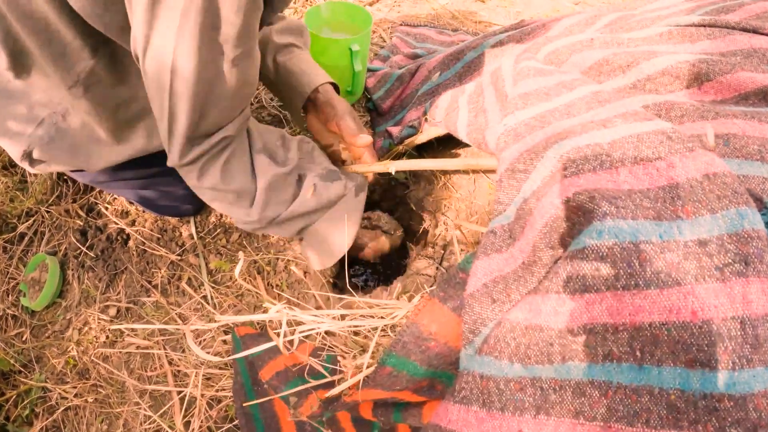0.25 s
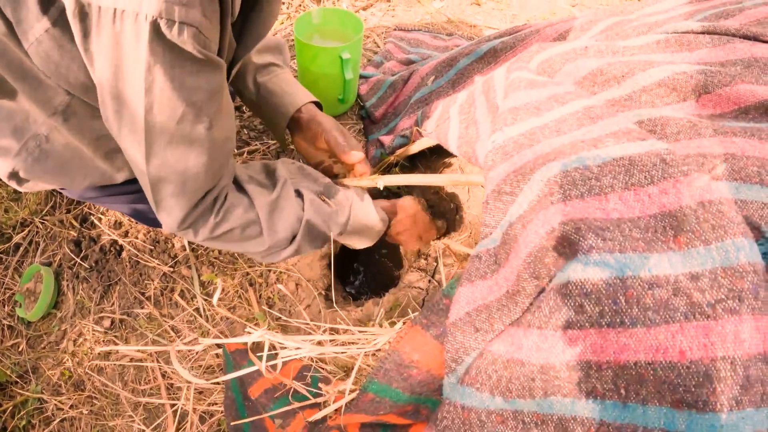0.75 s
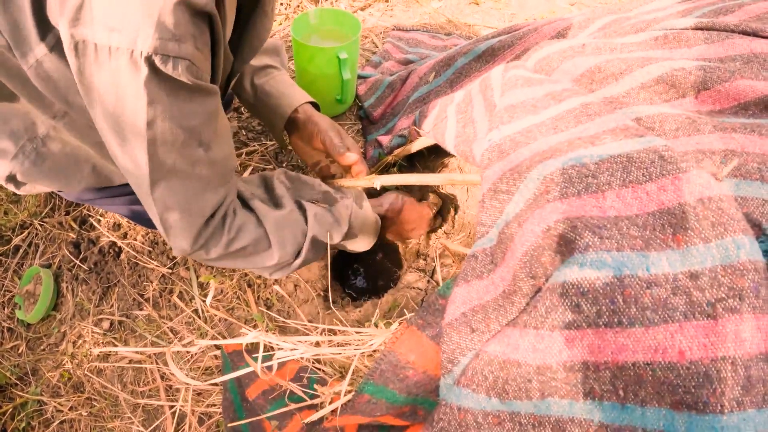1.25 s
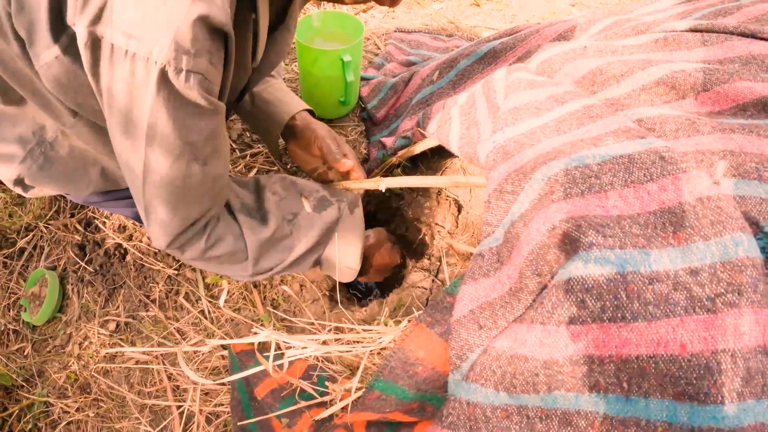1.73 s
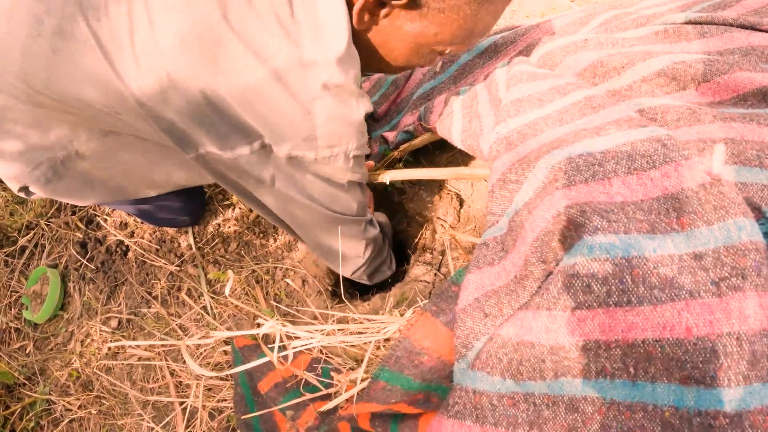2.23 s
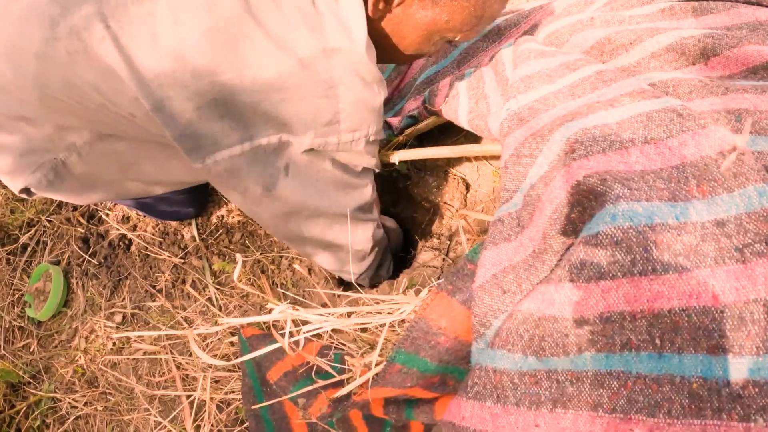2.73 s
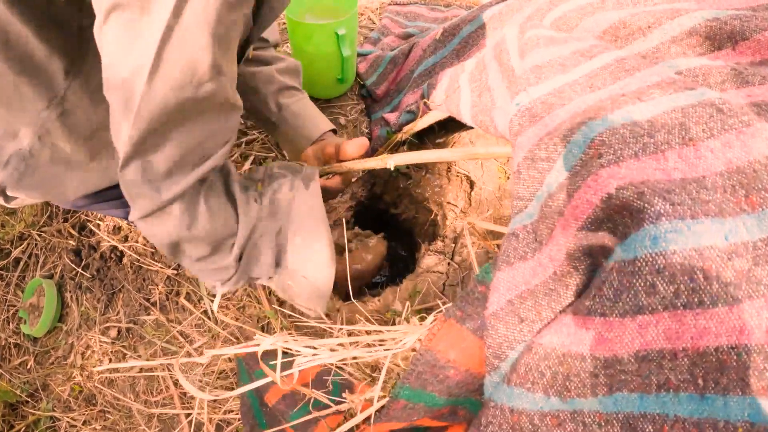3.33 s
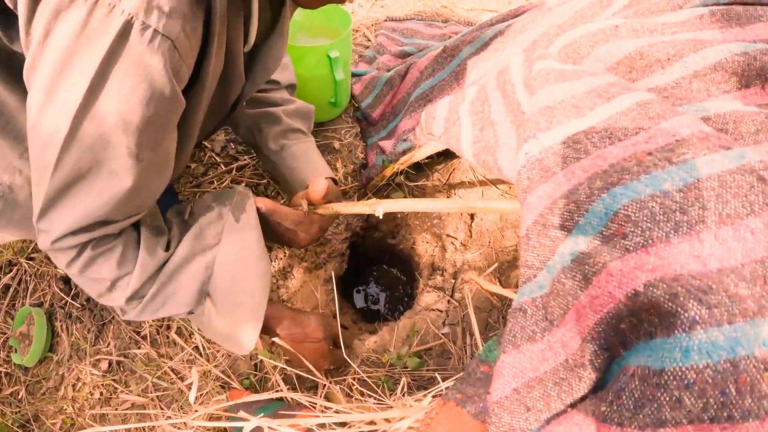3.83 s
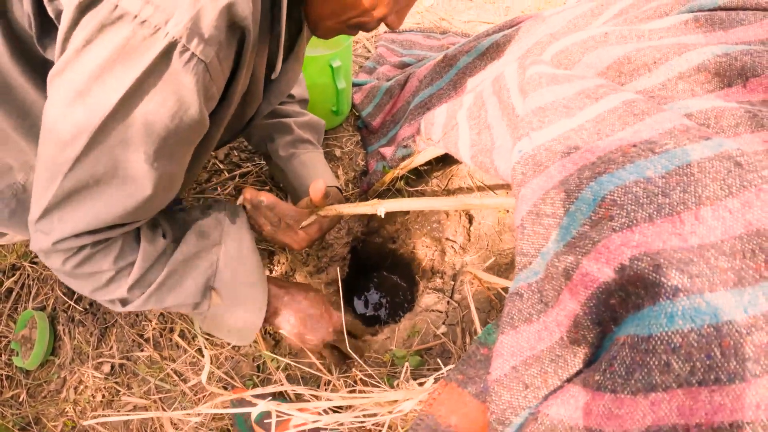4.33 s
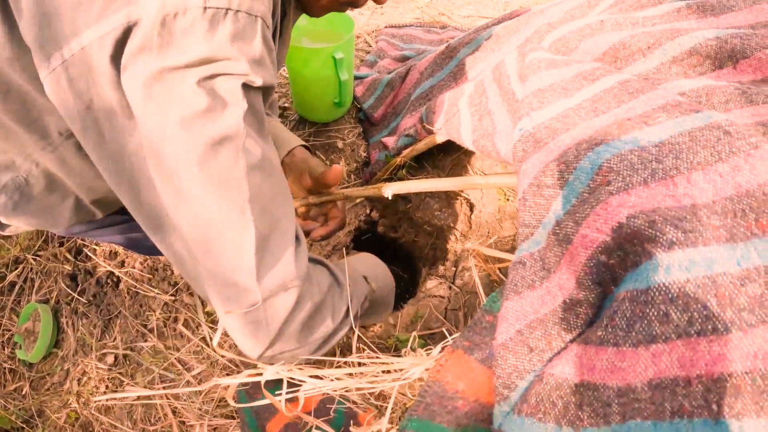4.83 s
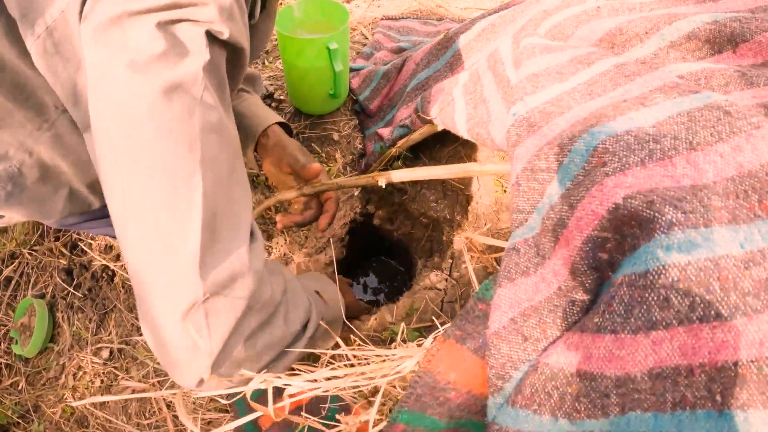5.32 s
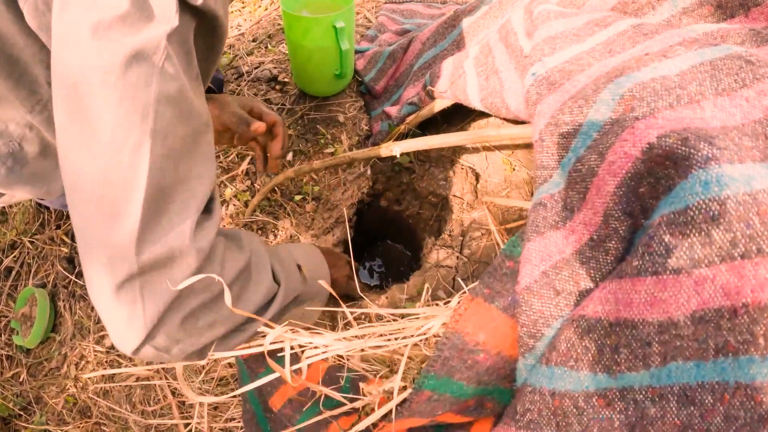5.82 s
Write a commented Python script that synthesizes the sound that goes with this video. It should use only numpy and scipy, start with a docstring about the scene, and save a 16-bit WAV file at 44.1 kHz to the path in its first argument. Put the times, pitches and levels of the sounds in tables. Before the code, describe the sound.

In quiet, dry grassland, hands work close to the microphone at a wet hole in the soil. Straw rustles and snaps, grit scrapes and mud gives small pops. A cricket trills thinly in bouts while small birds chip, then whistle, then twitter briefly about halfway through. Distant insects and a faint land rumble lie underneath. Low wind flutter on the microphone grows strongest in the last two seconds.

```python
"""A cricket trills in bouts in dry grassland, each closing wing stroke sounding one high note.
Up close, hands work a wet hole in the soil: straw rustles and snaps, grit scrapes, mud pockets pop.
Small birds whistle, chip and twitter over a bed of far insects, land rumble and a brief rough hum.
Wind sheds eddies off the microphone cover, a low flutter that is strongest in the last two seconds."""
import sys
import numpy as np
from scipy import signal
from scipy.fft import rfft, irfft, next_fast_len
from scipy.io import wavfile
from scipy.ndimage import uniform_filter1d, map_coordinates

SR = 44100
rng = np.random.default_rng(int(sys.argv[2]) if len(sys.argv) > 2 else 0)


def int16_out(signal):
    """Quantize to a 16-bit WAV file."""
    q = np.round(np.clip(np.atleast_2d(signal).T, -1, 1) * 32767)
    wavfile.write(sys.argv[1], SR, q.astype(np.int16))


N = 267642

# Cricket bouts; a positive pan is louder on the left: (start [s], end [s], first level [dB], last level [dB],
# one closing stroke [s], stroke rate [Hz], note [Hz], opening stroke [dB], sustain [ratio], pan [dB])
CRICKET_BOUTS = [(0, 0.236, -63, -59, .0935, 38.5, 7020, -4, .35, 4),
                 (0.982, 2.569, -58, -57.5, 1.0901, 38.2, 7025, -11, .1, -3.5),
                 (3.3, 4.863, -61, -64.5, 3.5031, 38.25, 7000, -9, .21, 4.5),
                 (5.573, 6.102, -69, -64.5, 5.7026, 37.9, 6975, -4.5, 0.4, 6)]

# Faders for the straw and cloth rustle: (time [s], hiss [dB], low body [dB], high body [dB])
RUSTLE_FADERS = [(0, -60, -63, -54.5), (.29, -70, -65, -56), (.57, -65, -60, -58), (.96, -69, -63.5, -61.5),
                 (1.45, -64.5, -64.5, -63.5), (1.85, -72, -63.5, -57.5), (2.25, -67, -61.5, -59.5),
                 (2.6, -71, -62.5, -63.5), (3.14, -67, -63, -58), (3.5, -66, -63, -63),
                 (3.87, -65, -65.5, -65), (4.55, -69.5, -65, -66), (4.9, -62.5, -66, -64.5),
                 (5.27, -68, -63, -64), (5.68, -61, -64, -62), (6.07, -75.5, -66, -69.5)]
# EQ of those three rustle layers: (frequency [Hz], gain [dB])
HISS_EQ = [(4000, -27), (6000, -4), (7300, -0.5), (8300, -10), (11900, -15), (14200, -11.5), (15600, -36)]
LOW_BODY_EQ = [(700, -51), (950, -2.5), (1050, 1), (1400, 1), (2000, -2.5), (2600, -29.5)]
HIGH_BODY_EQ = [(1500, -38), (2100, -0.5), (2900, 0.5), (3900, -3), (5000, -1), (7000, -7.5), (8000, -47)]
# Stereo width of all noise beds: (frequency [Hz], left-right likeness [ratio])
BED_LIKENESS = [(60, 0.89), (130, 0.8), (500, 0.43), (1500, 0.56), (3000, 0.41), (6000, 0.63), (10000, 0.8),
                (14000, 0.14)]
# Stereo balance of all noise beds: (frequency [Hz], pan [dB])
BED_PAN = [(60, -3), (150, -1), (350, -6), (1500, 2), (5000, 0.3), (10000, 2)]

# Faders for the far ambience: (time [s], rumble [dB], murmur [dB], insects [dB])
AMBIENCE_FADERS = [(0, -57.5, -72.5, -78), (.62, -57.5, -66, -67), (1.08, -57, -71, -61),
                   (1.45, -58, -71, -66.5), (2.21, -56, -67.5, -59.5), (2.7, -57.5, -71, -61.5),
                   (3.19, -56, -65.5, -62.5), (3.82, -56, -72, -59.5), (4.3, -58, -72.5, -61.5),
                   (4.87, -55, -70.5, -61), (5.22, -58.5, -72, -67), (5.6, -58, -68, -71),
                   (6.07, -60.5, -73.5, -66)]
# EQ of the open land's rumble and murmur: (frequency [Hz], gain [dB])
RUMBLE_EQ = [(15, -32), (25, 1), (47, -7.5), (86, -20.5), (102, -17.5), (146, -4), (183, -3), (480, -20),
             (620, -39), (1060, -120)]
MURMUR_EQ = [(250, -21), (400, -4.5), (600, -5), (900, -8.5), (1100, -38)]
# Bands of far insects: (centre [Hz], width [Hz], trim [dB])
INSECT_BANDS = [(5740, 30, -10), (5540, 60, -10), (4960, 250, -12), (6770, 360, -4.5), (5750, 900, -8)]

# Light air on the microphone: (time [s], level [dB])
BREEZE_FADER = [(0, -64), (1, -62.5), (2.1, -58), (2.75, -57), (3.3, -54), (3.8, -58.5), (4.1, -48),
                (4.48, -56.5), (4.9, -48.5), (5.3, -44), (6.07, -46.5)]
# Puffs of wind: (middle [s], length [s], level at the crest [dB], eddy rate [Hz])
WIND_PUFFS = [(0.16, 0.16, -51, 34.5), (.68, .06, -52, 32), (0.867, .08, -53.5, 32),
              (1.033, 0.07, -47.5, 36), (1.191, .12, -42.5, 55), (1.332, 0.064, -49, 38),
              (1.522, 0.14, -47.5, 48.5), (1.882, 0.086, -45, 62.2), (2.225, 0.24, -52, 48),
              (2.578, .13, -46.5, 59.5), (2.902, 0.068, -48.5, 55), (2.973, .07, -48, 56),
              (3.161, 0.091, -45.5, 52.04), (3.249, 0.083, -43, 58.2), (3.361, .07, -46, 55),
              (3.462, .12, -47.5, 36), (3.581, 0.17, -44.5, 41.7), (3.93, 0.17, -33, 54.75),
              (4.03, .15, -34.5, 54), (4.157, 0.088, -32, 51), (4.256, 0.085, -37, 46),
              (4.354, 0.13, -43, 45.9), (4.6, .14, -42.5, 48.2), (4.701, 0.1483, -31.5, 52.9),
              (4.816, .1, -36, 48), (5.025, .24, -29, 55.5), (5.157, .11, -30.5, 55),
              (5.27, 0.14, -30, 53.1), (5.4, 0.095, -36, 42.1), (5.479, .12, -33.5, 45.08),
              (5.599, 0.12, -36, 45.1), (5.743, 0.078, -37.5, 42), (5.816, 0.09, -30, 45.97),
              (5.901, 0.093, -33.5, 44.34), (6.02, .16, -36, 42)]
# EQ of the wind's buffeting: (frequency [Hz], gain [dB])
BUFFET_EQ = [(8.8, -22), (15, -1), (59, -8.5), (78, -5), (120, -15.5), (160, -33), (260, -120)]

# Breaking straw: (time [s], level [dB], body trim [dB], body centre [Hz])
STRAW_SNAPS = [(.0708, -43, 3, 3010), (.1092, -41, 5, 3010), (.2074, -46, 5, 3020), (.2563, -51, 4, 5910),
               (.2923, -51, 3, 5700), (.348, -43, -1, 2510), (.4015, -51, 15, 6000), (.4184, -43, -1, 2920),
               (.4633, -48, 1, 6500), (.499, -51, -3, 6500), (.531, -37.5, -5, 3810),
               (.5683, -43.5, 8, 5900), (.596, -50, 8, 4500), (.6122, -49, 17.5, 4400),
               (.6493, -46, -8, 5910), (.888, -48, 4, 5690), (1.2067, -46, -6, 2830),
               (1.3598, -47, -1, 5660), (1.4498, -46, -7, 5330), (1.498, -47, 6, 4800),
               (2.628, -40, -17, 5460), (3.3528, -47.5, 7, 3520), (3.4702, -37.5, -4, 3570),
               (3.5007, -43.5, 11, 5620), (3.527, -48, 9, 5670), (3.5481, -39, 11, 2650),
               (3.8099, -45, 4, 5000), (4.023, -52, 13, 2400), (4.241, -58.5, 15, 3800),
               (4.6916, -48.5, 1, 5990), (4.787, -43, -2, 4123), (4.8282, -35, 11, 4150),
               (4.8366, -33.5, 6, 5394), (4.845, -34.5, 10.5, 4190), (4.8615, -44, -9, 5130),
               (4.897, -42, -1, 4066), (4.9155, -36.5, 8, 4450), (5.0961, -45, 3.5, 2816),
               (5.3066, -47, -6, 5150), (5.449, -42, -10, 4830), (5.5228, -41, -8, 5954),
               (5.687, -38.5, -6, 5460), (5.7285, -40, 4, 4040), (5.9242, -51.5, 9, 5586)]

# Two-voiced bird chips: (time [s], upper voice [dB], lower voice [dB], pan [dB])
BIRD_CHIPS = [(.24, -57, -56, 0), (.448, -60, -60, 2), (.775, -67, -72, 5), (.95, -63, -63.5, 3),
              (1.236, -64, -66, 6), (1.405, -61, -56, 1), (1.585, -64, -56, -1)]
UPPER_S, UPPER_HZ = .05, [7750, 7870, 7600, 7020, 6350]  # a hooked fall
LOWER_S, LOWER_HZ = .066, [6720, 6620, 6400, 5850, 5400, 5300, 5350]  # a fall that lands flat
# Single bird notes: (time [s], length [s], first pitch [Hz], middle pitch [Hz], last pitch [Hz],
# level [dB], swell [dB], pan [dB])
BIRD_WHISTLES = [(1.749, 0.26, 5420, 4830, 4330, -63, -2, 3), (2.07, .11, 5600, 5490, 5600, -68, 2, 12),
                 (2.209, 0.19, 6050, 5970, 5950, -56, 3, 9), (2.504, .15, 6680, 6720, 6740, -53, 2, 2),
                 (2.63, .19, 6750, 6960, 7300, -59, 2, 3), (2.731, 0.15, 5070, 4720, 4420, -57, 2, 1),
                 (2.986, 0.17, 5250, 5257, 5274, -52.5, -3, -2),
                 (3.133, 0.053, 5760, 5780, 5740, -59, 2, 10), (4.072, 0.33, 5560, 4825, 4330, -64, 7, 2.5),
                 (4.47, .12, 5540, 5470, 5490, -54, 6, 2), (4.605, 0.17, 6010, 5950, 5903, -53, 4, 4),
                 (0.782, 0.035, 4800, 4200, 3800, -69, 0, 2), (1.037, .034, 3100, 2900, 2700, -65, 0, 10),
                 (1.885, .048, 7060, 7620, 8150, -60, -2, 5), (3.418, .035, 7600, 7820, 8100, -70, 0, 5),
                 (3.725, .032, 3670, 4000, 3100, -65.5, 0, 5), (3.8, 0.057, 3900, 4110, 4250, -59, -7, 1),
                 (5.201, .032, 3120, 3154, 3267, -63.5, 1, 4), (5.415, .06, 2750, 2400, 2260, -67, 0, 5),
                 (5.548, 0.041, 5100, 4930, 4950, -66, 0, 0), (5.73, 0.038, 4090, 4030, 3780, -67, 0, 9)]
# Steep falling calls: (time [s], level [dB])
BIRD_SWOOPS = [(2.741, -58.5), (2.854, -61), (2.951, -57.5), (3.052, -55.5)]
SWOOP_S, SWOOP_HZ = .038, [4330, 3730, 3230, 2788, 2500]
# A twitter of quick falling strokes: (middle [s], middle pitch [Hz], level [dB])
BIRD_TWITTER = [(3.15, 4320, -59), (3.164, 4500, -60), (3.181, 5250, -53), (3.198, 4450, -57),
                (3.207, 5540, -58), (3.216, 5300, -52), (3.221, 4350, -56), (3.233, 4500, -46.5),
                (3.242, 5300, -52), (3.251, 4430, -45), (3.267, 4520, -48), (3.274, 4300, -48.5),
                (3.285, 4380, -51), (3.296, 3350, -60)]
STROKE_S, STROKE_FALL = .012, .17  # the fall is a share of the pitch

# A rough low hum: (time [s], pitch [Hz], level [dB])
HUM_PATH = [(.38, 369.7, -59), (.58, 410, -61), (.69, 370, -62), (.78, 410, -62.5), (1.14, 370.3, -71),
            (1.3, 366, -64)]
# Gritty rubs: (time [s], length [s], low cut [Hz], high cut [Hz], level [dB], pan [dB])
GRIT_SCRAPES = [(0.502, 0.13, 500, 4970, -58.5, 2), (0.715, 0.05, 1190, 3370, -59, 12),
                (1.003, 0.071, 800, 1770, -60, 3), (2.112, 0.064, 600, 2500, -58, 0),
                (2.361, 0.079, 1010, 8560, -57.5, 1), (2.588, 0.059, 548, 8200, -51, 0),
                (2.77, 0.063, 2206, 3800, -54.5, -1), (3.033, 0.049, 1100, 2200, -55, -4),
                (3.069, 0.081, 1500, 5850, -53.5, 1), (4.771, 0.075, 2490, 8950, -57, 4),
                (3.774, 0.038, 4500, 13000, -64, 2), (4.791, 0.12, 499, 13900, -58.5, 3),
                (5.09, 0.21, 1000, 12920, -62, 3), (5.69, .13, 820, 1250, -62, 11)]
# Mud and wood pops: (time [s], level [dB], pitch [Hz], click gain [ratio])
MUD_POPS = [(.531, -42.5, 1340, 1.6), (.555, -42, 3360, 1.7), (0.7034, -43, 1300, 4),
            (2.146, -43.5, 1420, 1.49), (2.385, -45, 1400, 1.1), (2.426, -44, 1400, 1.5),
            (2.597, -45, 2070, 3.4), (2.65, -48, 723, 2.4), (2.791, -44.5, 3430, 1.6),
            (2.992, -26.5, 1546, 0.23), (3.041, -33, 1720, .45), (3.051, -39.5, 1360, 0.83),
            (3.061, -43.5, 1445, 1.2), (3.243, -43.5, 1240, 1.5), (3.4795, -42.5, 663, 3.4),
            (3.547, -41, 2626, 1.5), (4.905, -46, 757, 2.4), (5.582, -52, 1305, .6), (5.739, -48, 980, .6)]


def amp(db):
    """Decibels to gain."""
    return 10 ** (np.asarray(db) / 20)


def unit(x):
    """Normalise to rms 1."""
    return x / np.sqrt(np.mean(x ** 2) + 1e-20)


def along(points, hz):
    """Read a (frequency, value) curve on a log frequency axis."""
    freqs, values = np.transpose(points)
    return np.interp(np.log(hz + 1), np.log(freqs + 1), values)


def automation(rows, t=None):
    """One per-sample lane for each column after the time."""
    times, *columns = np.transpose(rows)
    return [np.interp(np.arange(N) / SR if t is None else t, times, column) for column in columns]


def wobble(rate):
    """A smooth random modulator with rate knots a second."""
    return map_coordinates(rng.standard_normal(int(N * rate / SR) + 4), [np.arange(N) * rate / SR])


def equalise(x, response):
    """Apply a gain that is a function of frequency."""
    size = next_fast_len(N + SR // 2)
    return irfft(rfft(x, size) * response(np.fft.rfftfreq(size, 1 / SR)), size)[..., :N]


def bandpass(x, low_hz, high_hz, order=1):
    """A gentle low cut and high cut."""
    return signal.sosfilt(signal.butter(order, [low_hz, high_hz], "band", fs=SR, output="sos"), x)


def panned(x, pan_db):
    """Two channels, the left louder by pan_db."""
    return np.array([x * amp(pan_db / 2), x * amp(-pan_db / 2)])


def place(out, s, x, pan_db):
    """Lay a mono sound on a stereo track from time s."""
    start = round(s * SR)
    out[:, start:start + len(x)] += panned(x, pan_db)[:, :N - start]


def tone(hz):
    """A sine of rms 1 that follows a pitch curve."""
    return np.sqrt(2) * np.sin(2 * np.pi * np.cumsum(hz) / SR)


def noise_bed(eq, patchy_db, drive=1):
    """Wide stereo noise of rms 1, its gain mottled over time and frequency."""
    def mid_side_gains(hz):
        angle = np.arccos(np.clip(along(BED_LIKENESS, hz), -1, 1)) / 2
        return amp(along(eq, hz)) * [np.cos(angle), np.sin(angle)]

    spectra = signal.stft(drive * rng.standard_normal((2, N)), nperseg=512)[2]
    patches = uniform_filter1d(rng.standard_normal(spectra.shape[1:]), 6, axis=0)
    patches = unit(uniform_filter1d(patches, 10, axis=1))
    mottled = signal.istft(spectra * amp(patchy_db * patches), nperseg=512)[1][:, :N]
    mid, side = equalise(mottled, mid_side_gains)
    stereo = np.array([mid + side, mid - side])
    return unit(equalise(stereo, lambda hz: panned(1, along(BED_PAN, hz))))


def cricket(attack_s=.064, release_s=.023):
    """Each closing wing stroke sounds the wing's note; the opening stroke is lower, weaker and raspy."""
    t = np.arange(N) / SR
    out = np.zeros((2, N))
    sway_hz, sway_db = 14 * wobble(50), 1.5 * wobble(45) + 1.5 * wobble(8)
    rasp_hz, rasp_db = 120 * wobble(150), 3 * wobble(200)
    for start, end, first_db, last_db, stroke_s, rate_hz, hz, open_db, sustain, pan_db in CRICKET_BOUTS:
        gate = np.clip(np.minimum((t - start) / attack_s, (end - t) / release_s), 0, 1)
        fader = amp(np.interp(t, [start, end], [first_db, last_db]))
        swing = .5 + .5 * np.cos(2 * np.pi * rate_hz * (t - stroke_s))
        closing = unit(sustain + swing ** 1.74) * amp(sway_db) * tone(hz + sway_hz)
        opening = unit((1 - swing) ** 2.1) * amp(open_db + rasp_db) * tone(.965 * hz + rasp_hz)
        out += panned(gate * fader * (closing + opening), pan_db)
    return out


def straw_rustle():
    """Dry stalks rub: a hiss grained with tiny uneven ticks, over two darker body layers."""
    hiss_db, low_db, high_db = automation(RUSTLE_FADERS)
    ticks = (rng.random(N) < 200 / SR) * amp(np.minimum(4 * rng.exponential(size=N), 12))
    grain = 1 + .48 * np.convolve(ticks, np.hanning(130))[:N]
    hiss_gain = amp(hiss_db + 1.1 * wobble(10) + 2.2 * wobble(4.08))
    hiss = hiss_gain * noise_bed(HISS_EQ, patchy_db=2.5, drive=grain)
    low = amp(low_db + wobble(7)) * noise_bed(LOW_BODY_EQ, patchy_db=1.5)
    high = amp(high_db + .78 * wobble(14)) * noise_bed(HIGH_BODY_EQ, patchy_db=2.5, drive=grain ** .52)
    return hiss + low + high


def far_ambience():
    """Open land rumbles and murmurs under thin, drifting bands of far insects."""
    rumble_db, murmur_db, insects_db = automation(AMBIENCE_FADERS)
    out = amp(rumble_db) * noise_bed(RUMBLE_EQ, patchy_db=2)
    out += amp(murmur_db) * noise_bed(MURMUR_EQ, patchy_db=2.5)
    for hz, width, trim_db in INSECT_BANDS:
        band = [(hz - 2 * width, -60), (hz - width / 2, 0), (hz + width / 2, 0), (hz + 2 * width, -60)]
        out += amp(insects_db + trim_db + wobble(1.84)) * noise_bed(band, patchy_db=1)
    return out


def wind(breeze_hz=38, octave_db=-29):
    """Eddies shed off the microphone cover: rough in light air, a low tone once a puff locks them in."""
    power = amp(automation(BREEZE_FADER)[0]) ** 2
    weighted_hz = power * breeze_hz  # the strongest air sets the pitch
    for s, length, db, eddy_hz in WIND_PUFFS:
        start = round((s - length / 2) * SR)
        swell = np.abs(np.sin(np.linspace(0, np.pi, int(length * SR)))) ** 1.2
        puff = (amp(db) * swell[:N - start]) ** 2
        power[start:start + len(puff)] += puff
        weighted_hz[start:start + len(puff)] += puff * eddy_hz
    hz = weighted_hz / power * (1 + .0494 * wobble(25))
    lull_db = uniform_filter1d(-29.5 - 10 * np.log10(power), size=SR // 4)  # depth below a strong puff
    roughness = np.clip(lull_db / 28, .13, .7)
    locked = tone(hz) + amp(octave_db + 3.7 * wobble(14)) * tone(2 * hz)
    buffet = noise_bed(BUFFET_EQ, patchy_db=3)
    return np.sqrt(power) * (np.sqrt(1 - roughness ** 2) * locked + roughness * buffet)


def straw_snaps(creak_s=.006, faint_db=-53, thud_db=-5):
    """A stalk creaks for an instant, then breaks: a bright crack, a duller body, a jolt to the ground."""
    out = np.zeros((2, N))
    t = np.arange(SR // 25) / SR
    from_peak = np.abs(t - creak_s - .001)
    spike = 2.3 * (from_peak == from_peak.min())
    transient = amp(-60 * from_peak / np.where(t > creak_s, .008, .005))
    skirt = .09 * amp(-60 * from_peak / np.where(t > creak_s, .04, .02))
    small_stalks = rng.uniform([.02, faint_db, 0, 3000], [6, faint_db, 9, 6300], size=(14, 4))
    for s, db, body_db, body_hz in [*STRAW_SNAPS, *small_stalks]:
        pan_db = rng.normal(1.5, 1.5)
        bursts = (rng.standard_normal((3, len(t))) + spike) * (transient + skirt)
        bursts *= 5.4 / np.linalg.norm(bursts, axis=1, keepdims=True)
        crack = bandpass(bursts[0], 6000, 13500)
        body = amp(body_db) * bandpass(bursts[1], .72 * body_hz, 1.4 * body_hz)
        thud = amp(thud_db) * bandpass(bursts[2], 450, 2800)
        place(out, s - creak_s, amp(db) * (crack + body + thud), pan_db)
    return out


def birds():
    """Slightly hoarse notes glide under rounded swells; moving air makes them all flutter."""
    out = np.zeros((2, N))
    rasp = wobble(400)

    def sing(s, length, pitches, db, pan_db, swell_db=0, hoarse_hz=70, peaked=.59, glide_loss=0):
        """One note; fast glides duck it by glide_loss dB for each Hz a millisecond."""
        phase = np.linspace(0, 1, int(length * SR))
        knots = phase * (len(pitches) - 1)
        hz = map_coordinates(np.array(pitches, float), [knots], order=2, mode="nearest")
        duck_db = glide_loss * np.abs(np.gradient(hz)) * SR / 1000
        envelope = amp(db - duck_db + swell_db * (phase - .5)) * np.abs(np.sin(np.pi * phase)) ** peaked
        hz += hoarse_hz * rasp[round(s * SR):][:len(phase)]
        place(out, s, envelope * tone(hz), pan_db)

    for s, upper_db, lower_db, pan_db in BIRD_CHIPS:
        sing(s, UPPER_S, UPPER_HZ, upper_db, pan_db, hoarse_hz=115, glide_loss=.07)
        sing(s, LOWER_S, LOWER_HZ, lower_db, pan_db, hoarse_hz=95, glide_loss=.07)
    for s, length, *pitches, db, swell_db, pan_db in BIRD_WHISTLES:
        sing(s, length, pitches, db, pan_db, swell_db, hoarse_hz=36, peaked=.35)
    for s, db in BIRD_SWOOPS:
        sing(s, SWOOP_S, SWOOP_HZ, db, pan_db=0)
    faint_twitter = rng.uniform([3.07, 3300, -65.5], [3.25, 5580, -57], size=(30, 3))
    for s, hz, db in [*BIRD_TWITTER, *faint_twitter]:
        fall = [hz * (1 + STROKE_FALL / 2), hz * (1 - STROKE_FALL / 2)]
        sing(s - STROKE_S / 2, STROKE_S, fall, db, pan_db=3.5, peaked=1.8)
    return out * amp(1.8 * wobble(45) + 2.7 * wobble(220))


def passing_hum():
    """A low wavering tone, fuzzed with noise around its pitch, fades in and out."""
    out = np.zeros((2, N))
    t = np.arange(HUM_PATH[0][0], HUM_PATH[-1][0], 1 / SR)
    hz, db = automation(HUM_PATH, t)
    fuzz = .69 + wobble(260)[:len(t)]
    envelope = signal.windows.tukey(len(t), .2) * amp(db + 2.2 * wobble(11.7)[:len(t)])
    place(out, t[0], envelope * fuzz * tone(hz), pan_db=-3)
    return out


def grit_scrapes():
    """Grains catch and let go in short rubs of band-passed noise."""
    out = np.zeros((2, N))
    grit = rng.standard_normal(N) * amp(4.2 * wobble(300))
    for s, length, low_hz, high_hz, db, pan_db in GRIT_SCRAPES:
        rub = bandpass(grit[round(s * SR):][:int(length * SR)], low_hz, high_hz, order=2)
        place(out, s, amp(db) * np.hanning(len(rub)) ** .5 * unit(rub), pan_db)
    return out


def mud_pops(ring_s=.011, ring_cycles=5):
    """A blunt click, then a cavity rings briefly, its note rising as it shrinks."""
    out = np.zeros((2, N))
    t = np.arange(SR // 25) / SR
    attack = 1 - np.exp(-t / .00018)
    for s, db, hz, click_gain in MUD_POPS:
        pan_db = rng.normal(-.5, 1.5)
        t60 = ring_s + ring_cycles / hz
        ring = np.sin(2 * np.pi * hz * t * (1 + 4 * t)) * amp(-60 * t / t60)
        burst = (1.2 * amp(-60 * t / .0013) + rng.standard_normal(len(t))) * amp(-60 * t / .01)
        click = click_gain * bandpass(burst, .45 * hz, 1.96 * hz)
        place(out, s, amp(db) * (ring + click) * attack, pan_db)
    return out


def ground_echo(x, send_db, t60=.14):
    """Grass and ground scatter a short tail behind the sound, different in each channel."""
    t = np.arange(SR // 6) / SR
    tail = rng.standard_normal((2, len(t))) * amp(-60 * t / t60)
    return x + amp(send_db) * signal.fftconvolve(x, tail / np.linalg.norm(tail[0]), axes=1)[:, :N]


def scene():
    """The mix: far birds get a touch more echo than the near hands; the rest stays dry."""
    wildlife = cricket() + ground_echo(birds(), send_db=-6)
    hands = ground_echo(straw_snaps() + mud_pops() + grit_scrapes(), send_db=-7)
    return wildlife + hands + straw_rustle() + far_ambience() + passing_hum() + wind()


def record(dry, top_hz=15725):
    """Master EQ: the top end rolls off, and nothing passes above top_hz."""
    rolloff = [(11000, 0), (13500, -7.5), (15500, -21)]  # (frequency [Hz], gain [dB])
    return equalise(dry, lambda hz: amp(along(rolloff, hz)) * (hz < top_hz))


dry = scene()
out = record(dry)
int16_out(out)
```